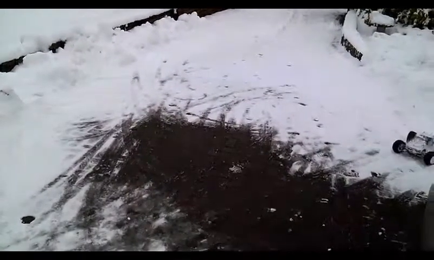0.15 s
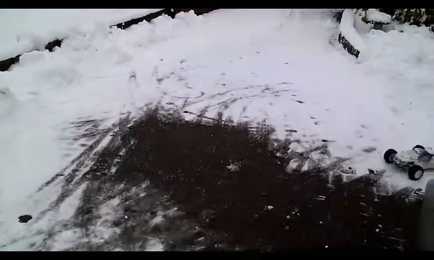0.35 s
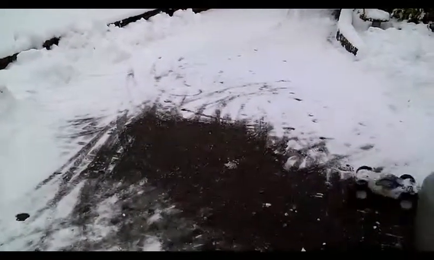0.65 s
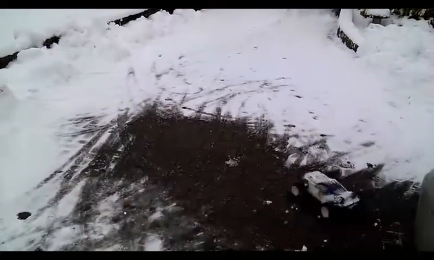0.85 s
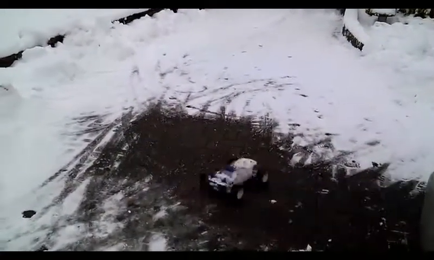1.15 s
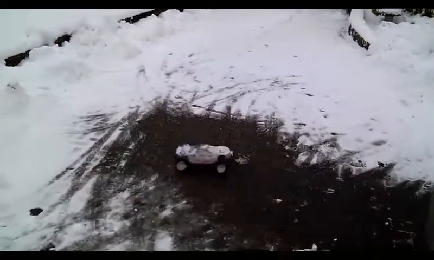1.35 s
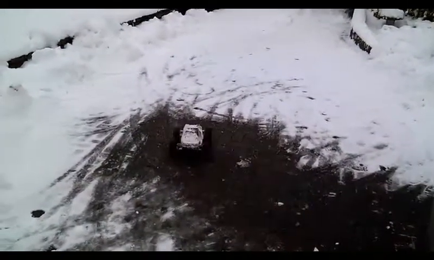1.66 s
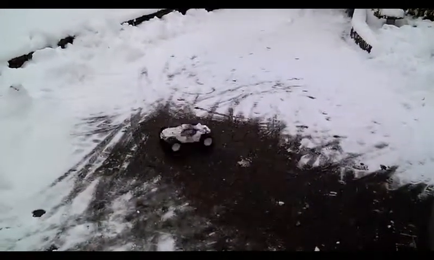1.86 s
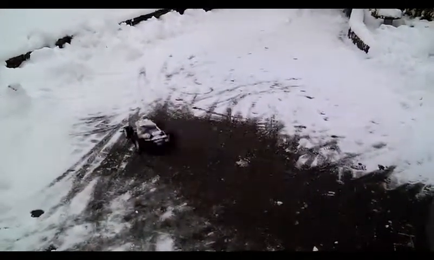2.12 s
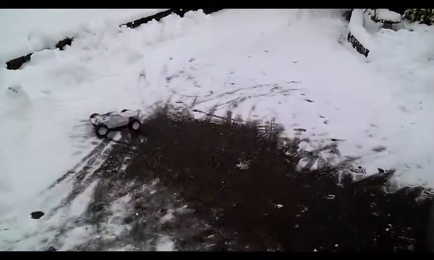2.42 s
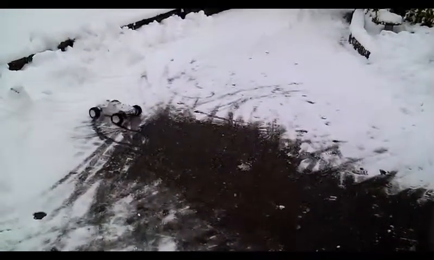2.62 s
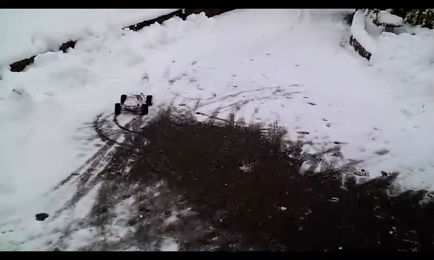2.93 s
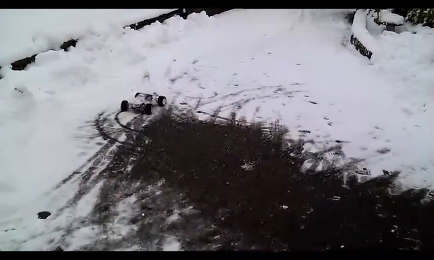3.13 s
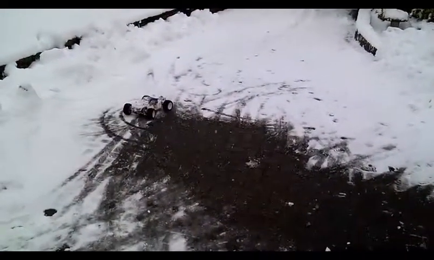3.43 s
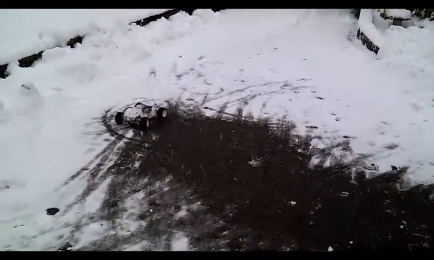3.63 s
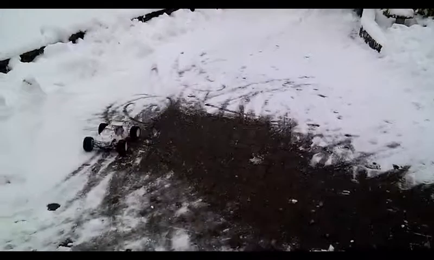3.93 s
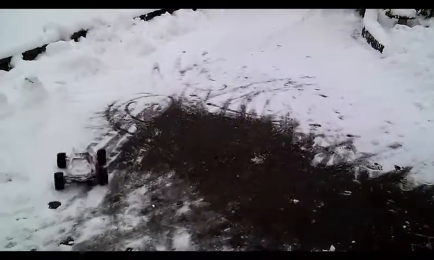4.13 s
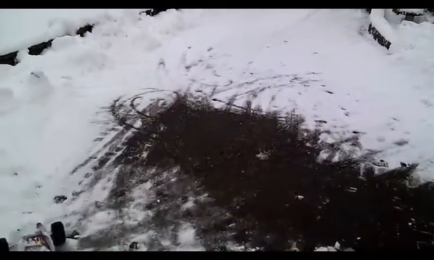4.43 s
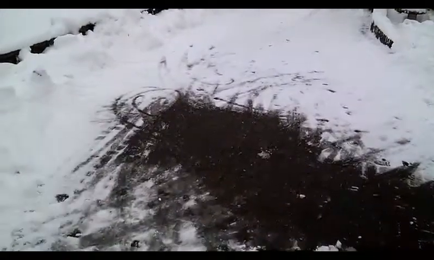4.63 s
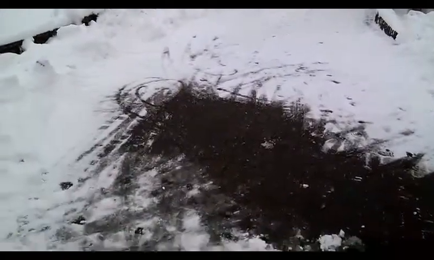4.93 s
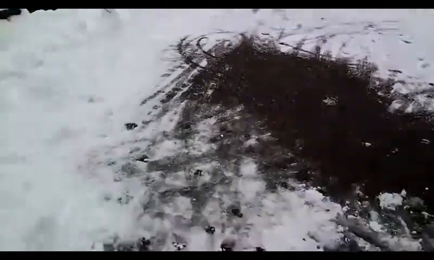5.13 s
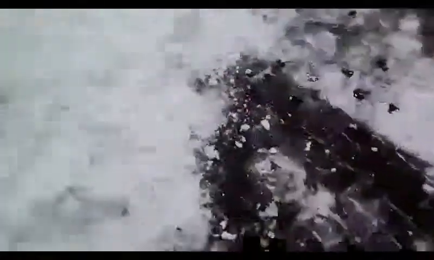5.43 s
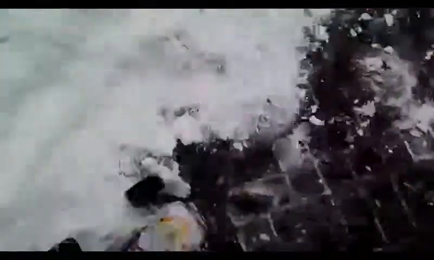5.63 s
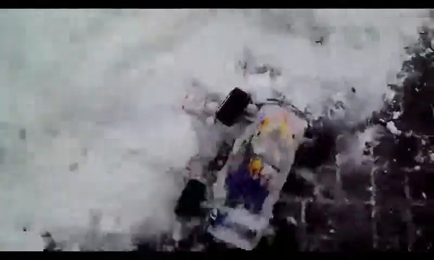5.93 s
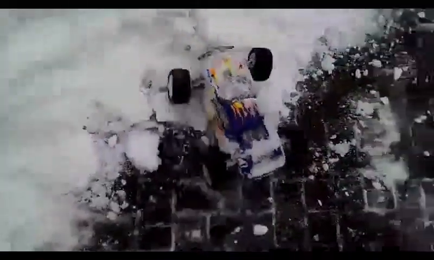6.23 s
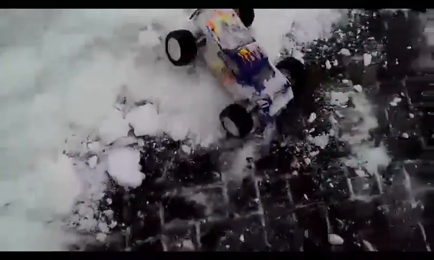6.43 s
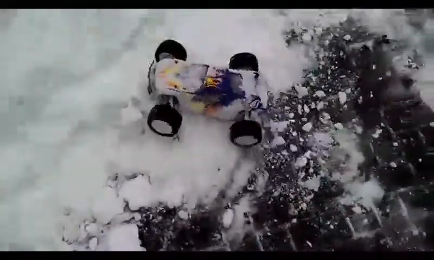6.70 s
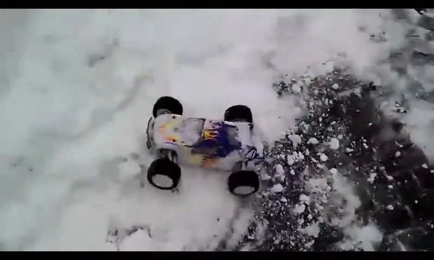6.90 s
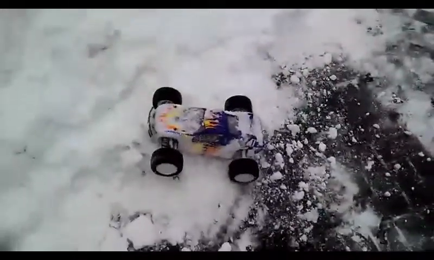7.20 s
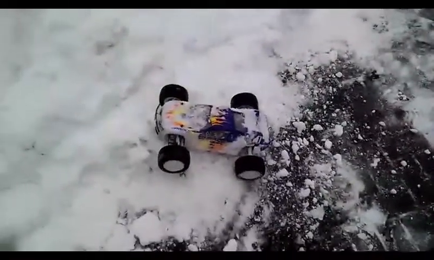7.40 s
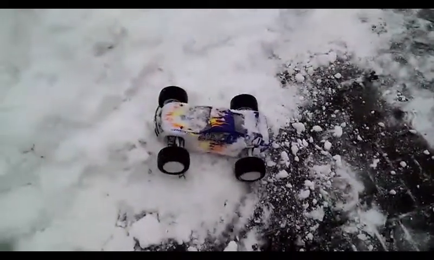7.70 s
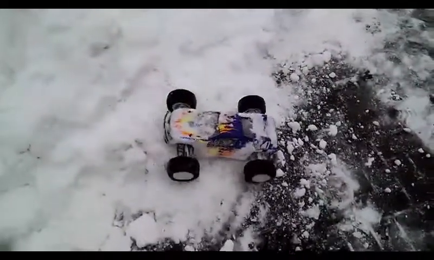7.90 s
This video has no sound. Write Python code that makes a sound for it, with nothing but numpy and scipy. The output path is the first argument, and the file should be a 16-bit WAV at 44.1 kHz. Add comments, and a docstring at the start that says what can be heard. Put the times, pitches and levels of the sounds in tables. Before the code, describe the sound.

Wavering high gear whine of a toy off-road car with slushy rattle, coasting to a clattering halt close by, spinning up, coasting down, restarting.

```python
"""A wavering gear whine comes first, over rattle and slush: a small electric off-road car skids on snow and
wet paving, coasts to a stop close by, spins up, coasts down and starts again.
Mesh tones follow the drivetrain rate; tiny random impacts ring the chassis, gear case and teeth; noise bursts
knock and scrape; the body shell drums, and the speed controller sings as two sidebands near 10 kHz.
Behind the car lie tyre thuds, gusty bass and quiet air, all shaped from noise."""
import sys
import numpy as np
from scipy import signal
from scipy.fft import rfft, irfft, next_fast_len
from scipy.io import wavfile
from scipy.ndimage import uniform_filter1d

SR = 44100
rng = np.random.default_rng(int(sys.argv[2]) if len(sys.argv) > 2 else 0)


def pcm_store(signal):
    """Save signal as 16-bit PCM."""
    levels = np.round(np.clip(np.atleast_2d(signal), -1, 1) * 32767)
    wavfile.write(sys.argv[1], SR, levels.astype(np.int16).T)


N = 355446
T = np.arange(N) / SR


def undb(db):
    """Decibels to gain."""
    return 10 ** (np.asarray(db) / 20)


def unit(x):
    """Scale to rms 1."""
    return x / np.sqrt(np.mean(np.abs(x) ** 2))


def curve(rows):
    """Each column of (time, value, ..) rows, joined by straight lines in time."""
    s, *columns = np.transpose(rows)
    return np.squeeze([np.interp(T, s, c) for c in columns])


def gate(start, end, size):
    """1 between two times [s], else 0, with edges smoothed over size samples."""
    return uniform_filter1d(1. * ((T > start) & (T < end)), size=size, mode="nearest")


def walk(rate):
    """Smooth chance with about this many turns a second, spread 1."""
    k = int(SR / rate) + 1
    return unit(uniform_filter1d(uniform_filter1d(rng.standard_normal(N), k), k))


def rough(rate):
    """Complex smooth chance that smears a tone in level and phase."""
    return walk(rate) + 1j * walk(rate)


def grit(share, scatter_db):
    """Dense tiny impacts of uneven size."""
    return (rng.random(N) < share) * rng.standard_normal(N) * undb(scatter_db * rng.exponential(size=N))


def colour(x, points):
    """Filter by (frequency [Hz], level [dB]) points, rms 1."""
    size = next_fast_len(N)
    hz, db = np.transpose(points)
    f = np.log(np.arange(size // 2 + 1) * SR / size + 1)
    gain = undb(np.interp(f, np.log(hz), db, -120, -120))
    return unit(irfft(rfft(x, size) * gain, size)[:N])


def cut(x, order, hz, kind="low"):
    """Butterworth filter."""
    return signal.sosfilt(signal.butter(order, hz, kind, fs=SR, output="sos"), x)


def ring(x, hz, width):
    """Two-pole resonance."""
    r = np.exp(-np.pi * width / SR)
    return signal.lfilter([1 - r, 0, r - 1], [1, -2 * r * np.cos(2 * np.pi * hz / SR), r * r], x)


def modes(x, table):
    """Steep resonances, each rung twice, rms 1."""
    return unit(sum(undb(db) * unit(ring(ring(x, hz, w), hz, w)) for hz, w, db in table))


# driving about, far off:
# (time [s], drivetrain rate = half the differential mesh rate [Hz], low line [dB], middle line [dB])
DRIVE = [(0, 674, -45, -53), (.33, 699, -54, -49), (.48, 661, -50, -53), (.65, 702, -51, -50),
         (.85, 665.4, -50, -45), (.93, 683, -42, -33), (1.2, 698, -40, -26), (1.33, 645, -28.5, -25.5),
         (1.47, 608, -27.5, -36), (1.66, 572.2, -35, -33.5), (1.82, 596, -34.5, -26.5),
         (2.06, 622, -20.5, -41), (2.17, 642, -25.5, -23.5), (2.45, 598.6, -33, -25.5),
         (2.63, 579, -25.5, -35), (2.82, 625.3, -38, -23), (3.0, 617, -31.5, -33.5),
         (3.2, 610.5, -23.5, -37), (3.3, 626.4, -26, -27.5), (3.55, 628.2, -41, -33.5),
         (3.9, 673.5, -32, -24.5), (4.45, 689.3, -30.5, -28), (4.62, 638, -35.5, -23.5),
         (4.95, 639, -33, -28), (5.3, 677.8, -31.5, -26), (5.37, 714.4, -27, -28), (5.39, 600, -44, -35),
         (5.6, 623.5, -22.5, -53)]
# throttle released: (time off [s], time of standstill [s], whine left [dB])
COAST = [(5.576, 5.999, -58), (7.453, 7.923, -9)]
# close by, the rate settles toward a new value at each change of grip: (time [s], rate [Hz],
# time constant [s], middle line [dB], then low, pinion and idler lines above it [dB])
GRIP = [(6.19, 721, 0.096, -0.5, -4, -3.5, -19), (6.395, 737, 0.097, -5.5, 1.5, 9.5, -15),
        (6.47, 727, .095, -6.5, 4.5, 6, 3), (6.6, 835, 0.14, 0.5, -4, -9, -4),
        (6.745, 359.4, 0.082, -2.5, 1, 0, -8), (6.865, 537, 0.2, -1, -20, -1.5, -10),
        (7.06, 735, 0.048, -8, -11, -9, -5), (7.105, 736, 0.046, -3, -23, -16, 5),
        (7.186, 661.5, 0.032, -5.5, -9, -5, -21), (7.294, 761, .04, 1, -6, -9, -15),
        (7.36, 751, 0.05, -7, -5, -13, -4), (7.901, 739, 0.046, -6, -17, 0, -11)]
# mesh tones per drivetrain cycle, a row far off and a row close by: (low, middle, pinion, idler)
MULTIPLES = [(1.62, 2, 6, 4), (2, 3, 6, 5)]
# how hard the off-centre spur gear wobbles under load: (time [s], share [0-1])
WOBBLE = [(0, 0.6), (.9, 0.53), (1.2, 0.29), (2.6, 0.1), (2.8, 0.11), (4.5, 0.9), (4.9, 0.58), (5.3, 0.87),
          (5.4, 0.62), (5.6, 0.55), (6.3, 0.44), (6.44, 0.07), (6.55, 0.4), (6.8, 0.87), (7.05, 0.7),
          (7.12, 0.1), (7.28, 0.2), (7.35, 0.6), (7.6, 0.9), (7.9, 0.2), (8.0, 0.26)]
# far off, the pinion line peaks on a resonance of the motor mount: (time [s], level on resonance [dB])
PINION = [(0, -54), (.3, -26.5), (.48, -26), (.65, -23.5), (.85, -28.5), (1.0, -25.5), (1.2, -26),
          (1.3, -20), (1.4, -32), (1.48, -26), (1.57, -25), (1.72, -31), (1.9, -34), (2.0, -27), (2.2, -38),
          (2.4, -29), (2.58, -28.5), (2.65, -28), (2.71, -27.5), (2.9, -37), (3.08, -30.5), (3.35, -37.5),
          (3.6, -37), (4.4, -26.5), (4.62, -33), (4.8, -24.5), (5.0, -21.5), (5.15, -20), (5.3, -20.5),
          (5.36, -17), (5.38, -25), (5.4, -25.5), (5.44, -24), (5.52, -23.5)]
# a fainter mesh line between the others, far off: (time [s], level [dB])
IDLER = [(0, -44.5), (1.05, -47), (1.2, -37), (1.35, -37), (2.2, -44), (3.5, -49.5), (4.4, -51), (5.1, -66),
         (5.3, -58), (5.6, -33)]
# close by, how loud a mesh line is at each pitch: (frequency [Hz], level [dB])
NEAR_LINE = [(1000, -34), (1300, -25.5), (1500, -24.5), (1800, -23.5), (2080, -32.5), (2330, -35),
             (2500, -49), (2800, -28.5), (3150, -34.5), (3650, -39.5), (3820, -29.5), (4050, -30),
             (4300, -29), (4500, -27)]
MOUNT_HZ, MOUNT_WIDTH_HZ, MOUNT_SPREAD = 3650, 75, 1.6  # the spread widens the peak with wobble
BITE_HZ, BITE_DB = 430, 160  # close by, the meshes lose this many dB per tenfold slowing below this rate
WAVER = .006  # share by which the speed wavers as the tyres slip
NEAR_FLICKER_DB = 2.2


def drive():
    """Drivetrain rate, line multiples and line levels; the whine drops off throttle."""
    hz, low_db, middle_db = curve(DRIVE)
    near = T > COAST[0][1]
    whine_db, upper_db, stops = np.zeros(N), np.zeros((3, N)), list(COAST)
    for s, goal_hz, lag_s, db, *top_db in GRIP:
        if stops and stops[0][0] < s:
            # off throttle the rate falls in a straight line
            off, stop, _ = stops.pop(0)
            hz[T > off] = hz[int(off * SR)] * np.clip((stop - T[T > off]) / (stop - off), 0, 1)
        later = T >= s
        hz[later] = goal_hz + (hz[later][0] - goal_hz) * np.exp((s - T[later]) / lag_s)
        whine_db[later], upper_db[:, later] = db, np.c_[top_db]
    hz = hz * (1 + WAVER * walk(13.71))
    multiples = [np.where(near, close, far) for far, close in zip(*MULTIPLES)]

    detune = (multiples[2] * hz - MOUNT_HZ) / (MOUNT_WIDTH_HZ * (1 + MOUNT_SPREAD * curve(WOBBLE)))
    pinion_db = curve(PINION) - 10 * np.log10(1 + detune ** 2)
    far_db = low_db, middle_db, pinion_db, curve(IDLER)

    bite_db = BITE_DB * np.log10(np.clip(hz / BITE_HZ, .1, 1))
    whine_db = uniform_filter1d(whine_db, size=2000) + bite_db
    # the middle line is the reference, 0 dB above itself
    above_db = np.insert(uniform_filter1d(upper_db, size=1000), [1], 0, axis=0)
    line_hz, line_db = np.transpose(NEAR_LINE)
    levels = []
    for multiple, distant_db, db in zip(multiples, far_db, above_db):
        pitch_db = np.interp(multiple * hz, line_hz, line_db)
        close_db = whine_db + db + NEAR_FLICKER_DB * walk(24) + pitch_db
        levels.append(np.where(near, close_db, distant_db))

    starts = [GRIP[0][0], GRIP[-1][0]]
    on = 1. - sum((1 - undb(db)) * gate(off, start, 1500) for (off, _, db), start in zip(COAST, starts))
    return hz, multiples, levels, on


# low, middle, pinion and idler lines: (smear rate [1/s], smear share before scaling [1], throb depth at
# wobble 1 [neper], phase swing at wobble 1 [rad], flicker [dB], octave before the gear cover [dB])
MESHES = [(170, .8, .4, 1.4, 1.5, -22), (150, .55, .25, .9, 1.3, -19), (520, .7, 1.0, 3.6, .8, -16),
          (260, .6, .4, 1.2, 2.5, -30)]
SPUR_TURN = .0882  # spur gear turns per drivetrain cycle
STEADY_SHARE, NEAR_SMEAR = .65, .75  # smear left when the spur gear runs true; further factor close by
RASP_HZ, RASP_TONE = 2200, .3  # the octave is mostly rasp: its smear rate and its clean part
RASP_PEAK_HZ, RASP_WIDTH_HZ = 7780, 2000  # the gear cover rings here


def whine(hz, multiples, levels):
    """Each mesh is a tone and octave smeared by tooth errors; every spur turn it swells and swoops down."""
    out, rasp = 0, RASP_TONE + rough(RASP_HZ)
    # the load on the teeth changes from turn to turn
    wobble = curve(WOBBLE) * np.exp(.18 * walk(35))
    turn = 2 * np.pi * SPUR_TURN * np.cumsum(hz) / SR + 0.8 * walk(16)
    smear_scale = np.where(T > COAST[0][1], NEAR_SMEAR, 1) * np.minimum(STEADY_SHARE + wobble, 1.25)
    names = "low", "middle", "pinion", "idler"
    for name, mesh, multiple, db in zip(names, MESHES, multiples, levels):
        smear_rate, share, depth, swing, flicker_db, octave_db = mesh
        smear = 1 + share * smear_scale * rough(smear_rate)
        throb = np.exp(wobble * depth * np.cos(turn)) * undb(flicker_db * walk(17.3))
        throb /= np.sqrt(uniform_filter1d(throb ** 2, size=12000))  # keep the average level
        phase = 2 * np.pi * np.cumsum(multiple * hz) / SR + wobble * swing * np.cos(turn + .5)
        spin = np.exp(1j * phase)
        octave = unit(np.real(rasp * spin ** 2))
        if name == "pinion":
            octave = ring(octave, RASP_PEAK_HZ, RASP_WIDTH_HZ)
        tone = unit(np.real(smear * spin)) + undb(octave_db) * octave
        out = out + undb(db) * tone * throb
    # the mount picks out the low end of each swoop
    return out + ring(out, MOUNT_HZ, 230.0)


FULL_HZ, SLOW_DB = 604, 17  # below this rate, dB lost per tenfold slowing


def slowing(hz):
    """Decades of speed lost below full rate, as a negative number."""
    return np.log10(np.clip(hz / FULL_HZ, .03, 1))


# rattle and slush with the wheels at speed:
# (time [s], chassis level before a 6 dB cut [dB], tooth hiss above it [dB])
RATTLE = [(0, -26.5, -5), (.8, -29.5, -4.5), (.95, -28, -4.5), (1.15, -24, -6), (1.25, -22, -4),
          (1.6, -19, 2), (1.8, -23, 8), (2.2, -20, -0.5), (2.35, -22.5, 4.5), (2.66, -20, -3.5),
          (2.88, -23.5, 7.5), (3.07, -22, 2.5), (3.17, -22, -5), (3.33, -21, -6.5), (3.52, -26, -0.5),
          (3.75, -24, -5), (4.41, -21, -4), (4.75, -22, -4.5), (5.16, -20.5, -17), (5.32, -19, -7.5),
          (5.5, -21.5, -6.5), (5.8, -17, -28), (6.2, -26.5, -37), (6.33, -21, -3), (6.94, -19, -2),
          (7.4, -24.5, -2.5), (7.62, -28, -7), (7.79, -34.5, -20), (7.88, -18, -38), (7.95, -25.5, -11.5),
          (8.06, -27.5, 1)]
# gear case: (time [s], level above the chassis [dB])
CASE_LEVEL = [(0, -3), (.8, 2.5), (1.0, -6.5), (1.8, -3.5), (3.3, -8.5), (4.5, -11), (5.0, -2.5), (5.6, -2),
              (6.3, -4.5), (7.4, -6.5), (8.06, -10)]
# slush spray: (time [s], level above the tooth hiss [dB])
SPRAY_LEVEL = [(0, -16), (1.8, -16), (2.9, -13.5), (3.5, -16.5), (4.6, -12), (5.3, -9), (5.8, -16),
               (6.5, -16), (7.4, -35), (8.06, -27)]
# chassis spectrum: (frequency [Hz], relative density [dB per Hz])
CHASSIS = [(180, -26), (300, -15), (415, -35.5), (489, -14.5), (937, -6), (1230, -3), (1380, -3),
           (2600, -13.5), (3380, -24.5), (5720, -120)]
# spray spectrum before brightening: (frequency [Hz], relative density [dB per Hz])
SPRAY = [(4120, 3), (7000, 4.5), (9600, 0.5), (12200, -15.5), (14600, -14), (15600, -19)]
# gear case resonances: (frequency [Hz], width of each pass [Hz], relative level [dB])
CASE = [(3015, 720, -0.5), (3590, 1390, 9)]
# loose tooth resonances: (frequency [Hz], width of each pass [Hz], relative level [dB])
TEETH = [(3570, 240, -1.5), (4790, 1020, -0.5), (5263, 1380, 9.5), (5850, 200, -6)]
# the rattle hollows out around a pitch that shifts as the car moves:
# (start [s], end [s], frequency [Hz], width [Hz], share removed [0-1])
DIPS = [(0, .92, 4780, 300, 0.7), (0, 1.202, 2000, 500, 0.4), (1.795, 2.25, 3300, 501, 0.7),
        (2.25, 3.398, 3170, 500, 0.56), (3.4, 4.55, 3137, 500, 0.64), (4.56, 5.099, 2793, 784, 0.6),
        (5.45, 5.946, 2160, 403, 0.91), (6.226, 6.747, 2795, 898.5, 0.63), (6.852, 7.052, 3440, 500, 0.9)]
BRIGHT = 0.36  # dB of top octave gained per dB of spray


def rattle(hz, cycles):
    """Impacts ring the chassis and the gear case, swelling with each turn of wheels and spur."""
    (db, teeth_db), case_db = curve(RATTLE), curve(CASE_LEVEL)
    db = db + SLOW_DB * slowing(hz)
    spray_db = teeth_db + curve(SPRAY_LEVEL)
    # the wheels turn at half the spur rate
    wheel = np.cos(np.pi * SPUR_TURN * cycles + 0.5 * walk(19.0))
    spur = np.cos(2 * np.pi * SPUR_TURN * cycles + 0.5 * walk(8.7))
    shake = walk(40.0)
    body = colour(grit(.3, 0.83), CHASSIS) * undb(1.0 * wheel + 0.83 * shake)
    case = modes(grit(.3, 0.99), CASE)
    case = case * undb(case_db + 0.33 * spur + 0.17 * shake + 2.1 * walk(37))
    teeth = cut(modes(grit(.25, 1.8), TEETH), 5, 7000)
    teeth = teeth * undb(teeth_db + .9 * spur + .9 * shake + 1.4 * walk(13))
    spray = colour(grit(0.46, 1.5), SPRAY)
    # a harder spray is also a brighter one
    top = cut(spray, 4, 10500, "high")
    spray = spray + (undb(BRIGHT * (spray_db + 10)) - 1) * top
    spray = spray * undb(spray_db + 1.17 * shake + 2.2 * walk(8.7))
    out = undb(db - 6.0) * (body + case + teeth + spray)
    for start, end, dip_hz, width, share in DIPS:
        out = out - share * gate(start, end, 4000) * ring(out, dip_hz, width)
    return out


# teeth knocking and tyre lugs catching: (time [s], peak before a 0.5 dB cut [dB], ring frequency [Hz])
KNOCKS = [(1.681, -15, 5610), (1.741, -17, 5890), (1.9245, -12, 5150), (4.384, -15.5, 5225),
          (5.365, -13.5, 1505), (5.41, -16, 1583), (5.573, -12.5, 1119), (5.602, -18, 1270),
          (5.63, -16, 1086), (5.662, -15.5, 2740), (5.696, -21, 3570), (5.726, -26, 3360),
          (5.736, -22, 3410), (5.745, -16.5, 1040), (5.756, -16, 1400), (5.787, -20, 1400),
          (5.812, -17, 1350), (5.825, -18, 1237), (5.86, -23, 1050), (5.904, -30, 3800),
          (6.175, -19.5, 1070), (6.205, -34, 3880), (6.26, -19, 1602), (6.365, -16, 477),
          (6.776, -11.5, 1280), (6.812, -13, 1737), (6.831, -11.5, 1610), (6.859, -14, 5270),
          (6.882, -14, 1399), (7.126, -16.5, 3670), (7.148, -15, 2060), (7.3, -25, 2297),
          (7.335, -22, 2393), (7.362, -24, 2217), (7.388, -24, 1362), (7.418, -23, 1420),
          (7.445, -22, 5320), (7.493, -39, 5290), (7.512, -23, 1937), (7.529, -21, 1890),
          (7.565, -38, 1725), (7.615, -21.5, 1435), (7.643, -40, 5190), (7.708, -50, 1265),
          (7.838, -36, 3960), (7.857, -28, 1000), (7.884, -25, 1001), (7.911, -28, 936), (7.931, -20, 1275)]


def knocks():
    """Short scrapes: a noise burst, part broad, part ringing, dull above the plastic's range."""
    out = np.zeros(N)
    t = np.arange(4000) / SR
    for s, db, hz in KNOCKS:
        envelope = (1 - np.exp(-t / .0018)) * np.exp(-(t / .012) ** 2)
        burst = rng.standard_normal(len(t)) * envelope
        ringing = unit(ring(ring(burst, hz, 280.0), hz, 700.0))
        broad = unit(np.diff(burst, prepend=0) + 0.077 * burst)
        hit = cut(ringing + 0.85 * broad, 7, 6300)
        i = int(s * SR)
        out[i:i + len(t)] += (undb(db - 0.5) * hit / np.abs(hit).max())[:N - i]
    return out


# wheels slowing: (start [s], end [s], range from gap to catch [dB])
COASTING = [(5.648, 5.849, 7.5), (5.84, 5.937, 6), (7.353, 7.933, 7.5)]


def lumps():
    """While the wheels slow down, whine and rattle come in lumps at each catch with gaps between."""
    slow_db = uniform_filter1d(sum(db * ((T > a) & (T <= b)) for a, b, db in COASTING), size=1500)
    catch = np.zeros(N)
    for s, *_ in KNOCKS:
        i = slice(int((s - .03) * SR), int((s + .06) * SR))
        after = T[i] - s - .003
        # rises faster than it falls
        lump = np.exp(-(after / np.where(T[i] < s + .003, .006, .018)) ** 2)
        catch[i] = np.maximum(catch[i], lump)
    return undb(slow_db * (catch - 0.79))


# the body shell drums on low modes while the wheels spin close by:
# (start [s], loudest [s], end [s], frequency [Hz], level at loudest [dB])
SHELL = [(6.232, 6.58, 6.94, 589, -21.5), (6.419, 6.61, 6.8, 716, -26.5), (7.086, 7.2, 7.52, 565, -29),
         (7.947, 8.06, 9.2, 558, -33)]
SHELL_RATE, SHELL_CLIMB = 120, .03  # roughness [1/s]; share of its pitch below the top where a mode sets in
SHELL_RISE_DB, SHELL_FALL_DB = 11.5, 16.5


def shell():
    """Narrow modes roughened by chance; each climbs in pitch as it swells, then fades."""
    shaking = 0.9 + rough(SHELL_RATE)
    out = 0
    for start, top, end, hz, db in SHELL:
        swell_db = np.interp(T, [start, top, end], [db - SHELL_RISE_DB, db, db - SHELL_FALL_DB])
        pitch = np.interp(T, [start, top], [hz * (1 - SHELL_CLIMB), hz])
        tone = unit(np.real(shaking * np.exp(2j * np.pi * np.cumsum(pitch) / SR)))
        out = out + gate(start, end, 2500) * undb(swell_db) * tone
    return out


# the controller is heard: (start [s], end [s])
THROTTLE = [(6.2, 6.72), (6.85, 7.46), (7.89, 8.1)]
PWM_HZ, PWM_SIDE = 10090, .44  # switching rate; sideband offset per drivetrain rate
PWM_DB = -65, -69  # lower and upper sideband


def controller(cycles):
    """The switching tone splits into two sidebands as the motor turns."""
    on = sum(gate(start, end, 800) for start, end in THROTTLE)
    out = 0
    for side, db in zip((-1, 1), PWM_DB):
        phase = 2 * np.pi * (PWM_HZ * T + side * PWM_SIDE * cycles) + 0.62 * walk(90)
        out = out + undb(db) * np.cos(phase)
    return on * out


# wind and handling at the microphone: (time [s], level [dB])
WIND = [(0, -56), (1.7, -64), (4.1, -57.5), (5.8, -57.5), (6.5, -76), (6.97, -62), (7.07, -45.5),
        (7.22, -42.5), (7.45, -58), (7.52, -46), (7.65, -35), (7.79, -61), (7.87, -42), (7.925, -29),
        (7.97, -49), (8.02, -32.5), (8.06, -50)]
# tyres on the paving: (time [s], level with the wheels at speed [dB])
THUD = [(0, -53.5), (.8, -48.5), (5.1, -54), (5.45, -37), (5.77, -32.5), (6.2, -30.5), (6.4, -37),
        (6.65, -41.5), (7.07, -33), (7.45, -48), (7.65, -38.5), (7.8, -43), (7.93, -35), (8.06, -46)]
# bumps: (time [s], deep level [dB], thud level [dB])
BUMPS = [(.61, -44, -64), (4.999, -51, -35), (5.75, -62, -38), (5.797, -60, -30.5)]
BUMP_S = 0.018  # half length


def rumble(hz):
    """Gusty bass at the microphone and tyres thudding on the paving, with a few bumps."""
    bass = [(15, -30.5), (50, -33), (75, -7.5), (110, -1.5), (180, -2.5), (260, -8.5)]
    wind = colour(rng.standard_normal(N), bass)
    thud = modes(grit(.05, 2.26), [(296.0, 400, -10.0), (357, 420, 12.0)])
    deep = undb(curve(WIND) + 2.5 * walk(14))
    tyres = undb(curve(THUD) + SLOW_DB * slowing(hz) + 1.55 * walk(22))
    for s, deep_db, thud_db in BUMPS:
        bump = np.exp(-((T - s) / BUMP_S) ** 2)
        deep, tyres = deep + undb(deep_db) * bump, tyres + undb(thud_db) * bump
    return wind * deep + thud * tyres


# quiet air spectrum: (frequency [Hz], relative density [dB per Hz])
AIR = [(35, -64), (60, -55), (87, -28), (332, -17), (364, -42), (591, 0.5), (960, 5.5), (3840, -23),
       (15000, -74)]
AIR_DB = -46.5


def quiet_air():
    """Steady coloured noise."""
    return undb(AIR_DB) * colour(rng.standard_normal(N), AIR)


def scene():
    """Car, rumble and quiet air."""
    hz, multiples, levels, on = drive()
    cycles = np.cumsum(hz) / SR
    gears = on * whine(hz, multiples, levels) + rattle(hz, cycles)
    car = lumps() * gears + knocks() + shell() + controller(cycles)
    return (car + rumble(hz) + quiet_air())[None]


def record(dry):
    """A steep elliptic low-pass cuts the top above 15.72 kHz."""
    return signal.sosfilt(signal.ellip(10, .2, 70, 15720, fs=SR, output="sos"), dry)


dry = scene()
out = record(dry)
pcm_store(out)
```